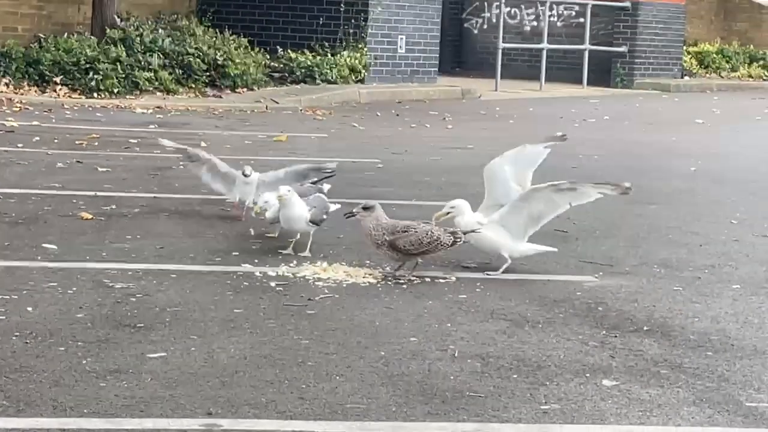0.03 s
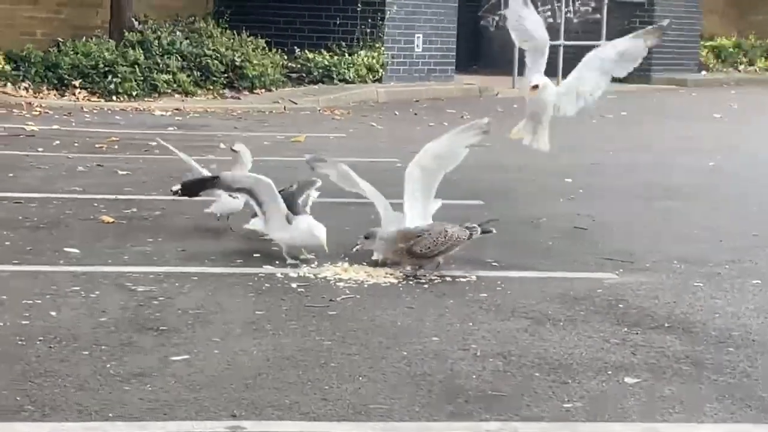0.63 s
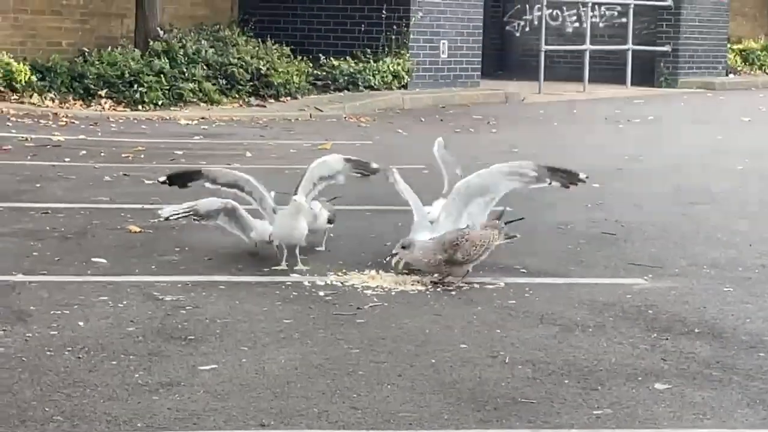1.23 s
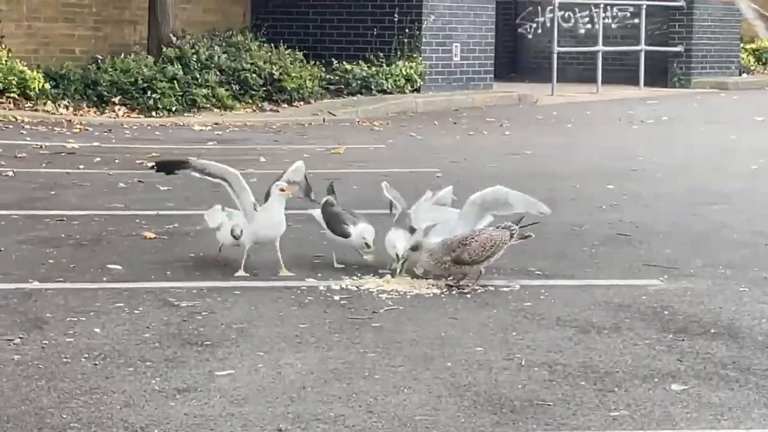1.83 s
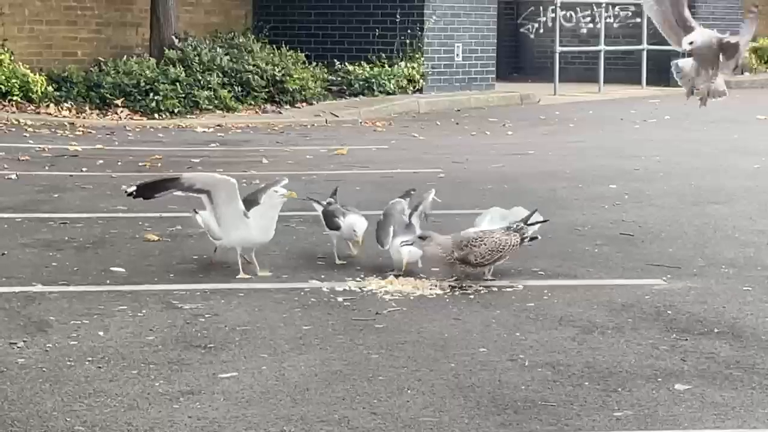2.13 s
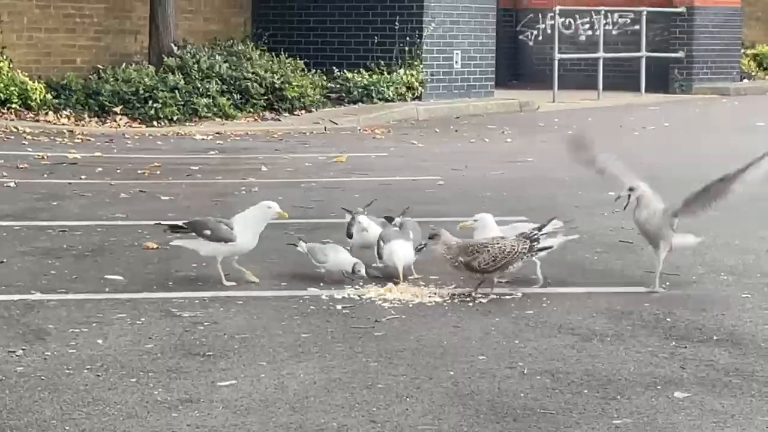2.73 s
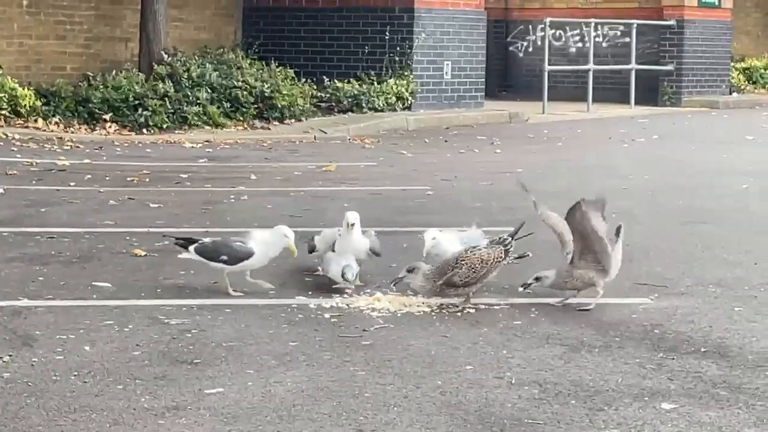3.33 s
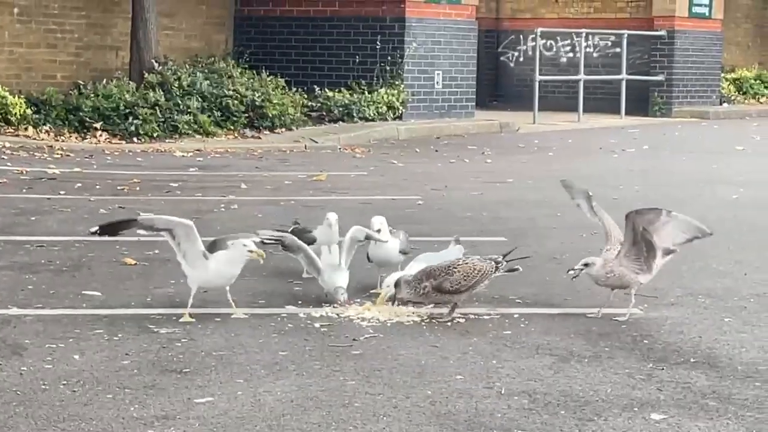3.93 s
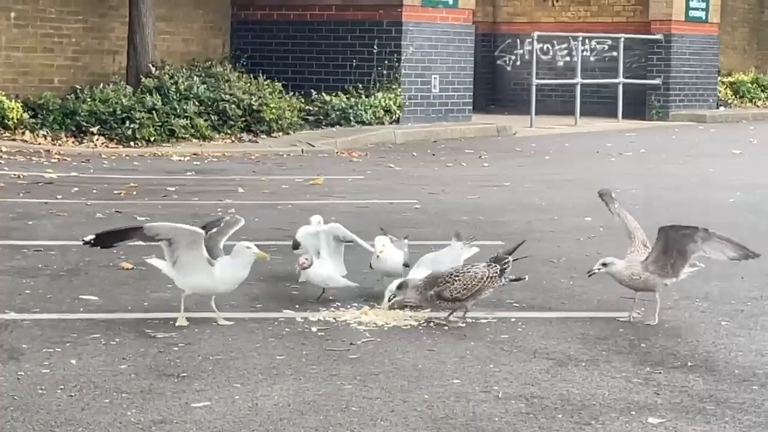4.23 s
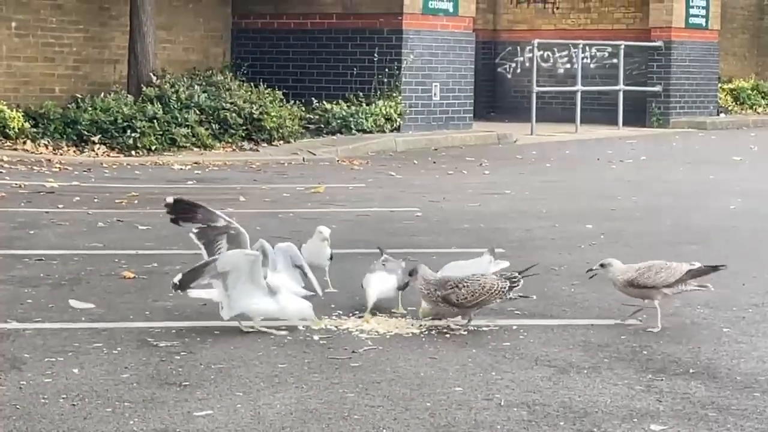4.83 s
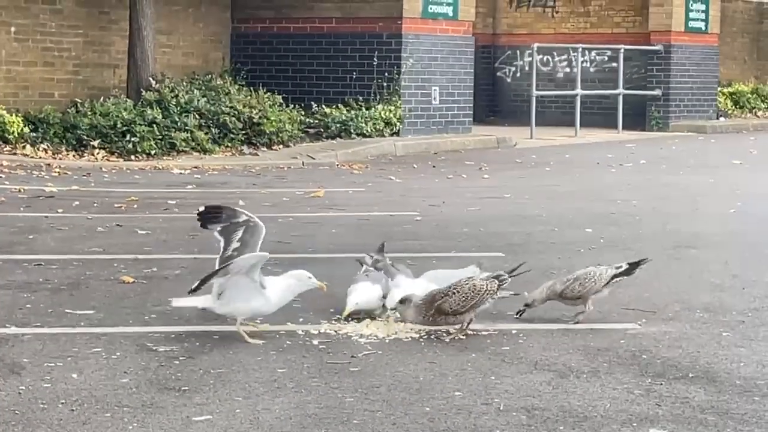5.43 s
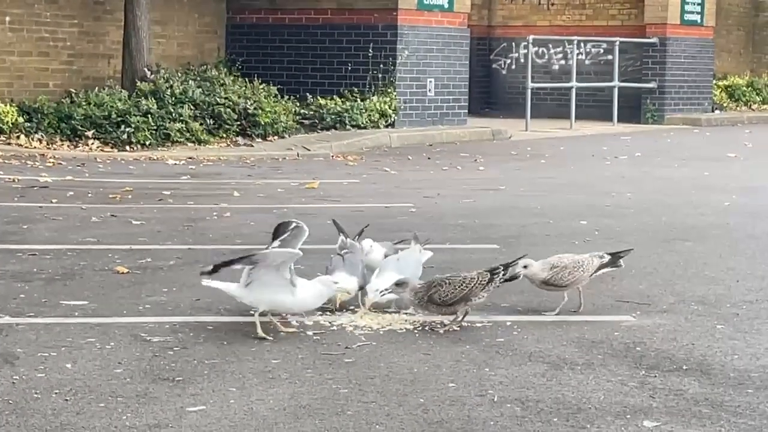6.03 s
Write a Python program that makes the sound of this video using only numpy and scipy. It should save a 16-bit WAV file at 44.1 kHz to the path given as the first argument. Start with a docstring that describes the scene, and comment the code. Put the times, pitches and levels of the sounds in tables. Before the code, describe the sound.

Gulls yelp, grumble and squawk over food in an open car park, with thin begging whistles and faint distant traffic.

```python
"""Gulls squabble over food in an open car park: mews that break into yelps, low grumbles, three harsh
squawks. Each cry is a syrinx buzzing through three throat resonances, hoarse at both ends and clearest
in between. A young bird begs in thin two-note whistles, and beaks click. A brick building echoes from
behind; distant traffic and a faint wind rumble underneath."""
import sys
import numpy as np
from scipy import signal
from scipy.fft import rfft, irfft, next_fast_len
from scipy.io import wavfile
from scipy.ndimage import uniform_filter1d, map_coordinates

SR = 44100
rng = np.random.default_rng(int(sys.argv[2]) if len(sys.argv) > 2 else 0)


def persist_wave(psi):
    """Save psi, clipped to +-1, as 16-bit WAV."""
    counts = np.round(np.clip(psi, -1, 1) * 32767).astype(np.int16)
    wavfile.write(sys.argv[1], SR, np.atleast_2d(counts).T)


N = 273420

# Middle throat resonance of mews and grumbles: f/Hz, gain/dB
MIDDLE_RESONANCE = [(1500, -11), (1850, 8), (2100, 6), (2400, 12), (2700, 5.5), (2900, 1.5), (3200, -26)]


def mews(end_s=0.034, mew_rough=0.13, break_s=0.041, yelp_odd_db=-36, upper_share=0.73):
    """A mew breaks into a yelp: odd harmonics drop out, so the voice jumps an octave and brightens."""
    # Per mew, rows of: t/s, f/Hz, level/dB
    contours = [
        [(0.0, 657, -29.5), (0.05, 662, -32.5), (0.095, 670, -29.5), (0.135, 648.7, -18.5), (0.195, 642.4, -18),
         (0.218, 619, -16), (0.235, 553, -16), (0.26, 528, -36)],
        [(0.415, 536, -33), (0.452, 573.6, -25.5), (0.5, 625, -35), (0.55, 646, -25.5), (0.595, 630, -37.5),
         (0.62, 657.4, -27.5), (0.7, 712, -25), (0.76, 633, -11), (0.802, 523, -21)],
        [(0.935, 483, -40.5), (0.972, 490, -31.5), (1.005, 581, -36.5), (1.06, 551, -37), (1.09, 652, -41),
         (1.13, 683, -30.5), (1.18, 721, -31.5), (1.225, 635, -21.5), (1.272, 505, -30)],
        [(1.38, 471.4, -47), (1.412, 542, -33), (1.45, 652, -38.5), (1.525, 697, -33.5), (1.542, 645, -20),
         (1.565, 601, -23), (1.598, 546, -33.5)],
    ]
    # Per mew: hoarse start/s, yelp onset/s, middle/dB, upper/dB, yelp lift/dB, yelp roughness/0-1
    voices = [(0.025, .1, 4, -7.5, 22, .03), (.1, 0.704, 15, -0.5, 10.5, 0.05),
              (0.089, 1.18, -1, -6.5, 1.5, 0.18), (0.06, 1.52, -10, -9.5, 1.5, 0.22)]
    # Upper throat resonance: f/Hz, gain/dB
    upper_resonance = [(2800, -39), (3250, 9.5), (3750, 1.5), (4500, -1), (5300, -6), (6400, -10),
                       (7500, -11.5), (10500, -26.5), (13500, -23)]
    track = np.zeros(N)
    for rows, (start_s, yelp_s, middle_db, upper_db, lift_db, yelp_rough) in zip(contours, voices):
        t, pitch_hz, db = curves(rows)
        clear = clearness(t, start_s, end_s)
        yelp = ramp((t - yelp_s) / break_s)
        rough = mew_rough + (yelp_rough - mew_rough) * yelp
        middle_db = middle_db + lift_db * yelp * clear + 4 * (1 - clear)
        upper_db = upper_db + upper_share * lift_db * yelp * clear + 5 * (1 - clear)
        buzz, rough = syrinx(pitch_hz, clear, rough, yelp_odd_db * yelp, waver=0.046, jitter=0.045,
                             smear=0.48, twin=0.54, rasp=0.23, rasp_hz=4000, shimmer_db=7)
        voice = throat(buzz, middle_db, upper_db, MIDDLE_RESONANCE, upper_resonance)
        add(track, t, voice * amp(db + flutter_db(rough, full_db=2)))
    return track * amp(-0.54)


def grumbles(held_rough=0.063, bark_middle_db=6, bark_upper_db=-3):
    """Low calls through a nearly shut beak; their hoarse ends bark in the middle resonance."""
    # Per grumble, rows of: t/s, f/Hz, level/dB
    contours = [
        [(0.285, 451, -40), (0.35, 489, -34.5), (0.39, 443, -39), (0.43, 472, -37), (0.475, 389, -37),
         (0.5, 394, -61)],
        [(0.305, 540, -48), (0.325, 560, -34.5), (0.35, 558, -31), (0.39, 534, -46.5)],
        [(1.715, 397.8, -55), (1.755, 419, -48.5), (1.782, 497.6, -37.5), (1.805, 541.4, -30),
         (1.83, 516.5, -33), (1.86, 561.6, -31.5), (1.885, 583, -27), (1.905, 510, -44)],
    ]
    # Per grumble: hoarse start/s, hoarse end/s, middle/dB, upper/dB
    voices = [(0.067, 0.018, -17, -17.5), (0.0255, 0.029, -32, -37), (0.067, 0.047, -9.5, -9)]
    # Upper throat resonance: f/Hz, gain/dB
    upper_resonance = [(2700, -40), (3200, 1), (3900, -3), (4600, 3.5), (5400, -24), (7000, -24),
                       (10500, -21), (13500, -42)]
    track = np.zeros(N)
    for rows, (start_s, end_s, middle_db, upper_db) in zip(contours, voices):
        t, pitch_hz, db = curves(rows)
        clear = clearness(t, start_s, end_s)
        bark = 1 - clearness(t, 0, end_s)
        middle_db = middle_db + bark_middle_db * bark
        upper_db = upper_db + bark_upper_db * bark
        buzz, rough = syrinx(pitch_hz, clear, held_rough, odd_db=0, waver=0.061, jitter=0.033,
                             smear=0.19, twin=0.3, rasp=0.88, rasp_hz=3200, shimmer_db=7)
        voice = throat(buzz, middle_db, upper_db, MIDDLE_RESONANCE, upper_resonance)
        add(track, t, voice * amp(db + flutter_db(rough, full_db=3)))
    return track * amp(2)


def squawks(quaver_per_s=55, quaver_share=0.022, quaver_db=1.7):
    """Harsh, rasping cries that brighten as the beak opens."""
    # Per squawk, rows of: t/s, f/Hz, level/dB, beak opening/0-1
    contours = [
        [(2.91, 433, -45, .3), (2.935, 434, -36, .1), (2.98, 431.5, -33.5, 0.36), (3.03, 499.5, -27, 0.03),
         (3.06, 581, -25.5, 0.14), (3.15, 616, -27.5, 0.21), (3.2, 583, -22, 0.18), (3.235, 593.6, -24.5, 0.74),
         (3.255, 650.3, -19, 0.59), (3.315, 641.4, -21, 0.75), (3.355, 562, -25.5, 0.69),
         (3.39, 478, -35, 0.83)],
        [(3.62, 493.5, -43, 1), (3.65, 559.5, -26.5, 0.61), (3.695, 694.5, -21, .95), (3.79, 682, -21, 0.86),
         (3.82, 652, -21.5, .9), (3.875, 656.5, -22, 0.95), (3.94, 622, -26, 0.77), (4.02, 606, -25.5, 0.86),
         (4.045, 654, -23.5, 0.84), (4.12, 641, -24, 0.72), (4.165, 540, -40.5, 0.66)],
        [(4.465, 447.5, -48, 0.7), (4.488, 481, -32, .3), (4.502, 478.5, -26, 0.81), (4.522, 664, -28.5, 0.66),
         (4.543, 710, -21.5, .75), (4.61, 675.5, -25, 0.7), (4.66, 674, -22.5, 0.82), (4.705, 587, -30, 0.41),
         (4.73, 542, -36, 1)],
    ]
    # Per squawk: hoarse start/s, hoarse end/s, held roughness/0-1, odd harmonics/dB, quaver/0-1
    voices = [(.075, .07, 0.19, -8, .5), (0.055, 0.043, .23, -2, .9), (.07, 0.073, 0.13, -12, .15)]
    # Middle and upper throat resonances: f/Hz, gain/dB
    middle_resonance = [(1500, -28), (1850, 5.5), (2100, 7), (2400, 3), (2700, -0.5), (2900, 0), (3200, -2)]
    upper_resonance = [(2750, -13.5), (3250, -2.5), (3950, -0.5), (4800, -3.5), (5700, -9), (6500, -16),
                       (7500, -26.5), (9200, -27), (10400, -21.5), (12000, -32), (13500, -40)]
    track = np.zeros(N)
    for rows, (start_s, end_s, held_rough, odd_db, quaver) in zip(contours, voices):
        t, pitch_hz, db, opening = curves(rows)
        clear = clearness(t, start_s, end_s)
        pressure = quaver * wobble(quaver_per_s, len(t))
        pitch_hz = pitch_hz * (1 + quaver_share * pressure)
        db = db + quaver_db * pressure
        middle_db = np.interp(opening, [0, 1], [-19, 5])
        upper_db = np.interp(opening, [0, 1], [-18.5, 11.5])
        buzz, rough = syrinx(pitch_hz, clear, held_rough, odd_db, waver=0.025, jitter=0.05, smear=0.33,
                             twin=0.9, rasp=0.6, rasp_hz=14000, shimmer_db=3.2, detune=0.075)
        voice = throat(buzz, middle_db, upper_db, middle_resonance, upper_resonance)
        add(track, t, voice * amp(db + flutter_db(rough, full_db=2.5)))
    return track * amp(-0.56)


def syrinx(pitch_hz, clear, held_rough, odd_db, waver, jitter, smear, twin, rasp, rasp_hz, shimmer_db,
           detune=0.05, hoarse_rough=0.611):
    """A strained membrane buzzes, wavers and slips from cycle to cycle. Returns sound and roughness."""
    size = len(pitch_hz)
    rough = np.clip(hoarse_rough + (held_rough - hoarse_rough) * clear, 0, 0.95)
    pitch_hz = pitch_hz * (1 + rough * (waver * wobble(130, size) + jitter * wobble(600, size)))
    phase = 2 * np.pi * np.cumsum(pitch_hz) / SR
    cycle = np.exp(1j * phase)
    # Under strain the other side breaks away, slightly sharp, and splits each harmonic.
    twin_cycle = np.exp(1j * phase * (1 + detune))
    odd_gain = amp(odd_db * clear)
    tone, twin_tone, buzz = 1, twin * rough, 0
    for order in range(1, 21):
        tone, twin_tone = tone * cycle, twin_tone * twin_cycle
        frayed = ramp(smear * order * rough + (order / 17) ** 3)  # high harmonics fray first
        gain = np.sqrt(1 - frayed ** 2) + frayed * fuzz(200 + 25 * order, size)
        gain = gain * amp(shimmer_db * wobble(35.46, size))
        windpipe_lag = np.exp(2j * np.pi * rng.random())
        buzz = buzz + (odd_gain if order % 2 else 1) * np.real(windpipe_lag * gain * (tone + twin_tone))
    puffs = rng.standard_normal(SR)[:size] * (1 + cycle.real)  # turbulent air escapes once a cycle
    hiss = filtered(puffs, lambda hz: 1 / (1 + (hz / rasp_hz) ** 4))
    return (1 - rough) * unit(buzz) + rasp * rough * hiss, rough


def throat(buzz, middle_db, upper_db, middle_resonance, upper_resonance):
    """Three parallel resonances, levels relative to the lowest; the upper dies first as the beak shuts."""
    # Lowest throat resonance: f/Hz, gain/dB
    low_resonance = [(300, -26), (480, -4.5), (650, -13.5), (850, -2.5), (1150, -3.5), (1380, -1),
                     (1650, -5.5), (1900, -66)]
    gains = amp(np.broadcast_arrays(np.zeros(len(buzz)), middle_db, upper_db))
    gains = gains / np.linalg.norm(gains, axis=0)
    remaining_s = np.arange(len(buzz))[::-1] / SR
    fade_s = np.array([[0.01], [0.012], [0.03]])
    gains = gains * ramp(remaining_s / fade_s)
    shapes = low_resonance, middle_resonance, upper_resonance
    return sum(gain * resonate(buzz, shape) for gain, shape in zip(gains, shapes))


def resonate(x, shape):
    """One resonance with steep skirts, held at rms 1."""
    low_hz, high_hz = shape[0][0], shape[-1][0]
    skirts = lambda hz: 1 / (1 + (hz / high_hz) ** 20) / (1 + (low_hz / (hz + 1)) ** 20)
    band = filtered(x, lambda hz: amp(along(shape, hz)) * skirts(hz))
    power = uniform_filter1d(uniform_filter1d(band ** 2, size=600), size=600)
    return band / np.sqrt(np.abs(power) + 1e-12)


def clearness(t, start_s, end_s, settle_s=0.027):
    """1 while the voice holds, falling toward 0 at its hoarse ends."""
    return 1 - ramp(np.maximum(start_s - (t - t[0]), end_s - (t[-1] - t)) / settle_s)


def flutter_db(rough, full_db):
    """Fast level flutter that grows with roughness."""
    return full_db * np.sqrt(rough) * wobble(162.1, len(rough))


def whistles(waver=0.028, drift=0.012, tremble_db=3, crack_db=2, pivot_hz=4810, upper_db_per_khz=9.5):
    """Hoarse two-note whistles. The third is a short ringing tone near 3.6 kHz with the fourth yelp;
    the others are a young bird begging, one note from each side of its syrinx."""
    # Per whistle, rows of: t/s, lower note f/Hz, level/dB
    contours = [
        [(0.22, 4520, -53), (0.28, 4360, -54.5), (0.34, 3960, -53), (0.44, 4100, -58)],
        [(1.24, 4940, -37), (1.33, 4530, -46), (1.4, 4440, -43), (1.48, 4480, -41), (1.55, 4570, -39),
         (1.62, 4480, -42), (1.68, 4080, -52)],
        [(1.55, 3785, -34), (1.575, 3520, -23), (1.605, 3705, -35.5), (1.635, 3600, -57)],
        [(2.228, 4140, -49), (2.25, 4005, -42.5), (2.275, 4540, -36), (2.35, 5210, -42), (2.42, 4590, -42),
         (2.525, 4990, -41), (2.61, 4410, -35), (2.69, 4610, -40.5), (2.755, 4760, -42), (2.82, 3905, -41.5),
         (2.885, 4760, -39.5), (2.93, 4750, -39.5), (2.96, 4660, -60)],
        [(4.845, 3340, -46), (4.865, 3370, -48), (4.895, 4160, -43.5), (4.935, 4540, -41.5),
         (4.98, 4810, -34.5), (5.065, 4795, -39.5), (5.12, 4900, -40.5), (5.22, 4620, -56)],
        [(6.12, 3700, -70), (6.14, 3880, -48), (6.17, 3970, -48.5), (6.2, 4420, -50)],
    ]
    # Per whistle: upper/lower pitch ratio, upper note at pivot_hz/dB, hoarseness/0-1, wheeze/dB
    voices = [(1.26, 1.5, 0.4, -26), (1.19, -1.5, 0.26, -21), (2.8, -12.5, 0.24, -19),
              (1.23, -1, .7, -23.5), (1.2, 6.5, 0.38, -38), (1.24, 6, 1, -18)]
    track = np.zeros(N)
    for rows, (ratio, upper_db, hoarse, wheeze_db) in zip(contours, voices):
        t, lower_hz, db = curves(rows)
        size, upper_hz = len(t), ratio * lower_hz
        upper_gain = amp(upper_db + upper_db_per_khz * (lower_hz - pivot_hz) / 1000)
        notes = 0
        for hz, gain in ((lower_hz, 1), (upper_hz, upper_gain)):
            bend = 1 + hoarse * waver * wobble(130, size) + drift * wobble(40, size)
            phase = 2 * np.pi * np.cumsum(hz * bend) / SR
            # A narrow and a wide noise band wrap the note.
            halo = 1 + hoarse * (fuzz(600, size) + 0.78 * fuzz(1600, size))
            flicker = amp(tremble_db * wobble(117.5, size) + crack_db * wobble(35.5, size))
            notes = notes + gain * flicker * np.real(halo * np.exp(1j * phase))
        octave_above = np.exp(2j * np.pi * np.cumsum(2 * upper_hz) / SR)
        wheeze = unit(np.real(fuzz(1700, size) * octave_above))
        add(track, t, amp(db) * (notes / np.hypot(1, upper_gain) + amp(wheeze_db) * wheeze))
    return track * amp(-0.4)


def pecks(t60_s=0.033, highpass_hz=2500):
    """Beak tips tick on the asphalt and clap shut."""
    # Beak clicks: t/s, relative level/dB
    clicks = [(2.237, -50), (3.525, -49.5), (4.476, -47), (5.7179, -54.5)]
    track, t = np.zeros(N), np.arange(SR // 20) / SR
    for start_s, db in clicks:
        envelope = amp(db + 6.5 - 60 * t / t60_s)
        track[round(start_s * SR):][:len(t)] += envelope * rng.standard_normal(len(t))
    return filtered(track, lambda hz: hz / (hz + highpass_hz))


def place(x, left_db):
    """A source slightly to one side; the microphone's two ports differ in gain and phase."""
    # Left minus right: f/Hz, level/dB
    balance = [(60, -10), (130, -16), (280, -2.5), (600, -1), (1300, 0.5), (2800, 0.5), (6030, 0.5),
               (13000, -1)]
    # Lead of the left port: f/Hz, phase/rad
    lead = [(500, 0), (1150, .5), (1750, .8), (2500, .4), (3500, .1), (5500, -.1), (6800, -.5), (7700, -2),
            (9500, -2), (13000, -1.3)]
    half = np.array([[0.5], [-0.5]])
    gain = lambda hz: amp(half * (left_db + along(balance, hz)))
    return filtered(x, lambda hz: gain(hz) * np.exp(1j * half * along(lead, hz)))


def car_park(x, tail_db, wall_db, wall_s=0.093, smear_s=0.024, near_db=-13, near_s=0.0069):
    """A thin diffuse tail, a smeared echo off the brick front, near scatter off asphalt and wings."""
    # Tail decay: f/Hz, t60/s
    decay = [(300, 0.46), (2500, 0.78), (5000, 0.43), (12000, 0.1)]
    hz, frame_s, spectra = signal.stft(rng.standard_normal((2, SR)), SR, nperseg=256)
    tail = signal.istft(spectra * amp(-60 * frame_s / along(decay, hz)[:, None]), SR, nperseg=256)[1]
    tail = tail + tail[::-1] / 2  # both ports hear much the same
    t = np.arange(tail.shape[1]) / SR
    wall = rng.standard_normal(len(t)) * (t > wall_s) * np.exp(-np.abs(t - wall_s) / smear_s)
    near = rng.standard_normal(len(t)) * (t > 0.002) * np.exp(-t / near_s)
    response = amp(tail_db) * tail / np.linalg.norm(tail[0])
    response += amp(wall_db) * wall / np.linalg.norm(wall)
    response += amp(near_db) * near / np.linalg.norm(near)
    return signal.fftconvolve(x[None], response, axes=1)[:, :N]


def traffic():
    """Distant traffic drones, slightly to the right."""
    # Swell of the drone: t/s, relative level/dB
    swell = [(0.0, -32.5), (1.2, -31.5), (1.85, -34), (2.05, -31), (2.47, -35.5), (2.85, -29.5),
             (3.05, -35), (3.45, -36), (3.65, -33.5), (5.8, -35), (6.2, -31)]
    # Drone spectrum: f/Hz, relative density/dB
    spectrum = [(20, -13.5), (32, -28), (45, -8), (55, -2), (63, 2.5), (72, 0), (84, -8), (115, -8),
                (160, -23.5), (260, -21.5), (450, -69)]
    times_s, db = np.transpose(swell)
    envelope = amp(np.interp(np.arange(N) / SR, times_s, db) + 1)
    return envelope * rush(spectrum, patchy_db=0) * amp([[-0.7], [0.7]])


def air(level_db=-40.5):
    """An even wash of town and wind."""
    # Wash spectrum: f/Hz, relative density/dB
    spectrum = [(88, -11), (150, -1.5), (184, -5), (430, -13.5), (519, -13.5), (985, -16), (1230, -22.5),
                (1800, -22.5), (3820, -33), (7230, -40), (8250, -49), (9240, -49.5), (13500, -50.5)]
    return amp(level_db) * rush(spectrum, patchy_db=0.2)


def rush(spectrum, patchy_db):
    """Stereo noise of rms 1 with patches of random gain."""
    # Left-right likeness: f/Hz, correlation
    likeness = [(60, 1), (150, 0.94), (360, 0.76), (880, 0.11), (2170, 0.87), (5310, 1), (13000, -0.32)]
    spectra = signal.stft(rng.standard_normal((2, N)), nperseg=512)[2]
    patches = uniform_filter1d(rng.standard_normal(spectra.shape[1:]), size=6, axis=0)
    patches = uniform_filter1d(patches, size=14, axis=1)
    pair = signal.istft(spectra * amp(patchy_db * unit(patches)), nperseg=512)[1][:, :N]
    angle = lambda hz: np.arccos(np.clip(along(likeness, hz), -1, 1)) / 2
    split = lambda hz: [np.cos(angle(hz)), np.sin(angle(hz))]
    mid, side = filtered(pair, lambda hz: amp(along(spectrum, hz)) * split(hz))
    return unit(np.array([mid + side, mid - side]))


def amp(db):
    """Decibels to gain."""
    return 10 ** (np.asarray(db) / 20)


def unit(x):
    """x at rms 1."""
    return x / np.sqrt(np.mean(x ** 2) + 1e-20)


def ramp(x):
    """x clipped to 0-1."""
    return np.clip(x, 0, 1)


def along(points, hz):
    """(f/Hz, value) points read on a log axis."""
    points_hz, values = np.transpose(points)
    return np.interp(np.log(hz + 1), np.log(points_hz), values)


def curves(rows):
    """The sample times a table spans, then each column at those times."""
    times_s, *columns = np.transpose(rows)
    t = np.arange(max(round(times_s[0] * SR), 0), min(round(times_s[-1] * SR), N)) / SR
    return [t] + [np.interp(t, times_s, column) for column in columns]


def wobble(knots_per_s, size):
    """A smooth random curve."""
    knots = rng.standard_normal(2048)
    coarse = np.arange(0, size + 8, 8)
    spline = map_coordinates(knots, [coarse * knots_per_s / SR], mode="wrap")
    return np.interp(np.arange(size), coarse, spline)


def fuzz(width_hz, size):
    """A complex random gain that spreads a tone into a band."""
    return (wobble(width_hz, size) + 1j * wobble(width_hz, size)) / np.sqrt(2)


def filtered(x, response):
    """x through a frequency response."""
    size = x.shape[-1]
    padded = next_fast_len(size + 4096)
    return irfft(rfft(x, padded) * response(np.fft.rfftfreq(padded, 1 / SR)), padded)[..., :size]


def add(track, t, x, fade_s=0.004):
    """Mix x into track at the times t, with soft ends."""
    edge_s = np.minimum(t - t[0], t[-1] - t)
    track[round(t[0] * SR):][:len(x)] += x * ramp(edge_s / fade_s)


def scene():
    """The flock a few metres away in the open; the whistles carry more echo."""
    mew, grumble, squawk, whistle = mews(), grumbles(), squawks(), whistles()
    flock = place(mew, left_db=0.62) + place(grumble, left_db=-0.037) + place(squawk, left_db=0.51)
    flock += place(whistle + pecks(), left_db=-0.057)
    echoes = car_park(amp(-3.5) * mew + grumble + squawk, tail_db=-17, wall_db=-36)
    echoes += car_park(whistle, tail_db=-11.5, wall_db=-18)
    return flock + echoes + traffic() + air()


def record(dry, top_hz=13700):
    """The sound has a narrow treble dip near 8.3 kHz and nothing above top_hz."""
    # Treble dip: f/Hz, gain/dB
    treble_dip = [(7000, -1.5), (7700, -6), (8300, -40.5), (9000, -1), (9600, 0.5)]
    return filtered(dry, lambda hz: amp(along(treble_dip, hz)) * (hz < top_hz))


dry = scene()
out = record(dry)
persist_wave(out)
```